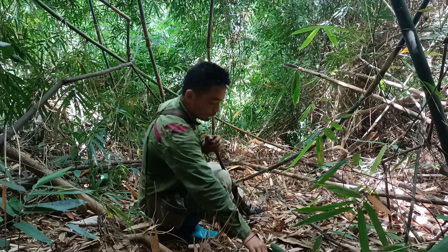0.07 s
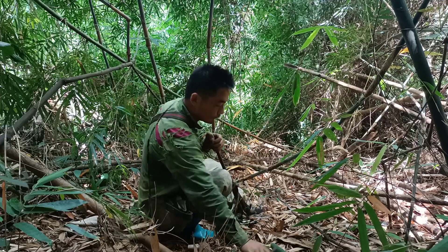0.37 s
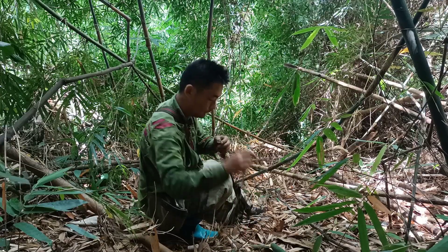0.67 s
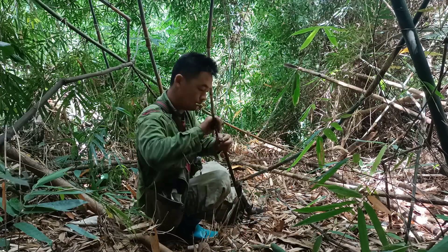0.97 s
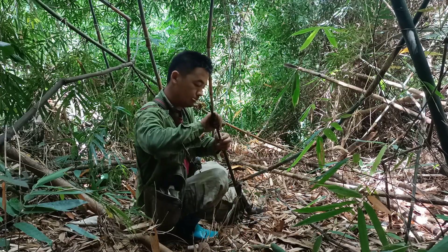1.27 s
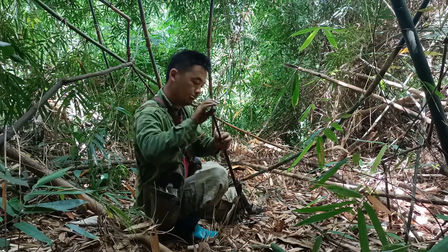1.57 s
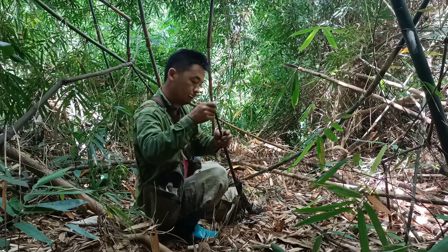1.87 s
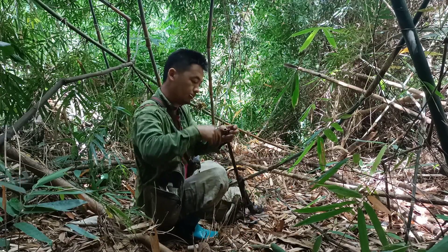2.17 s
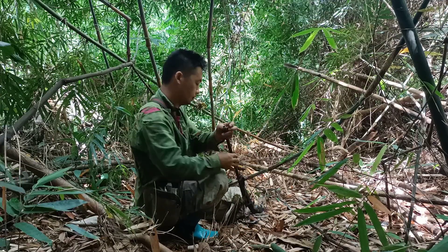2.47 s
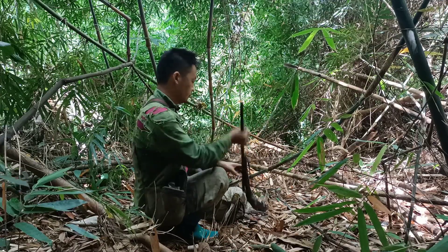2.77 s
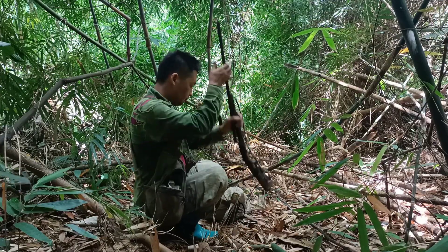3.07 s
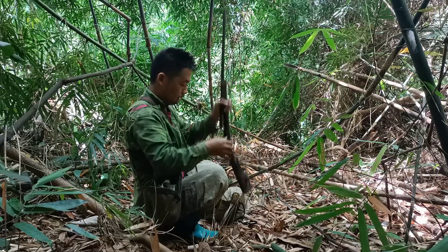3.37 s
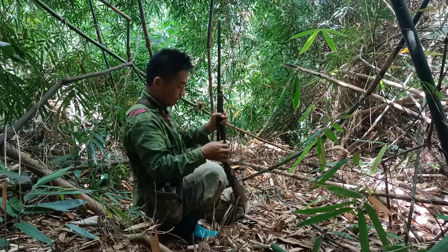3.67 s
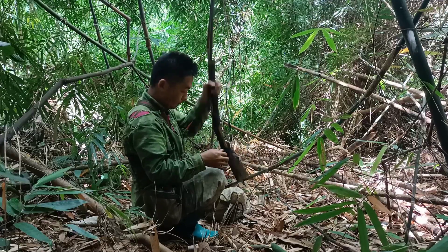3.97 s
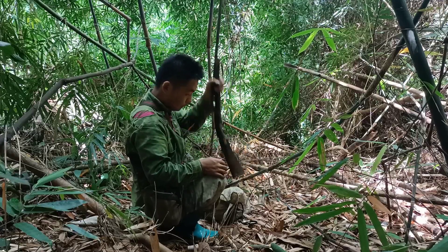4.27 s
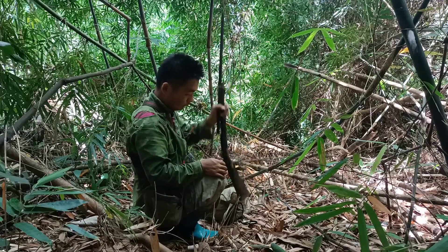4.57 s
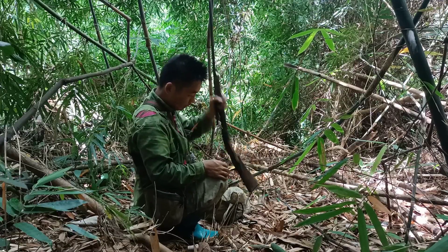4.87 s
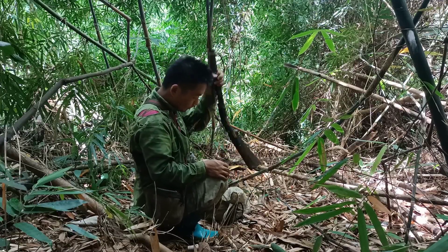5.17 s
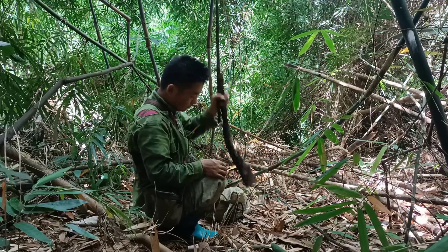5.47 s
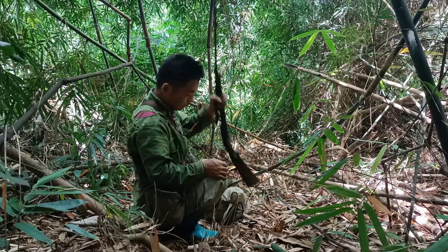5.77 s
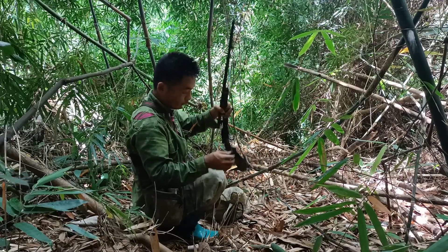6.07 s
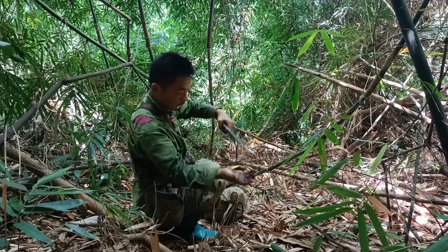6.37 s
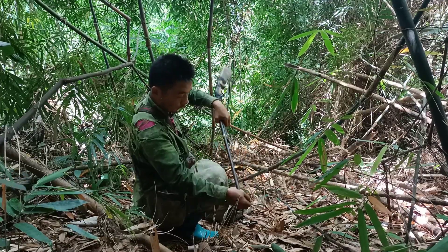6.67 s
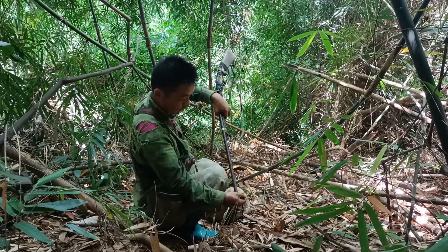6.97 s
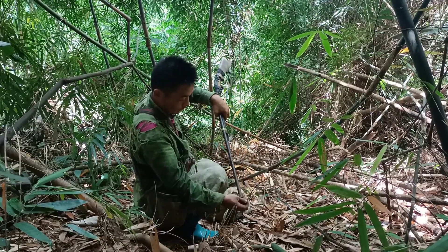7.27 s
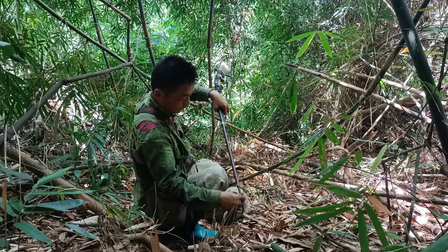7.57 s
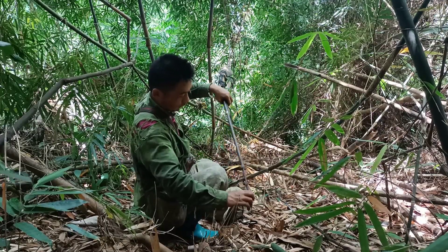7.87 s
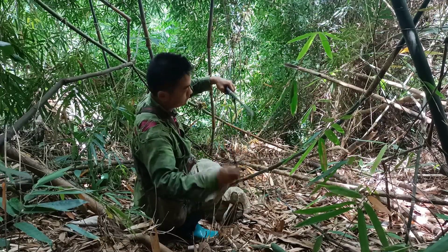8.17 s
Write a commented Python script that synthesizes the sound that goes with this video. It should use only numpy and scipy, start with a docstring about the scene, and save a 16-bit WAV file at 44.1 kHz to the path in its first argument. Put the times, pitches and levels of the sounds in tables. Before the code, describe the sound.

A steel ramrod clinks, squeaks and is rammed six times down a gun barrel, then scrapes out, with dry leaves crackling in a quiet forest.

```python
"""A thin steel rod is rammed into a long steel tube, on the leaf litter of a bamboo forest.
A crouching man brushes dry leaves, taps the rod on the tube's mouth and slides it in, squealing.
Six times he lifts it, knocking the wall, and rams it onto the packed bottom with a dull thud;
then he draws it out with a long scrape. Blows ring the modes of rod and tube, tiny friction slips
keep them ringing as a rasp, and the bamboo stems scatter a short tail over quiet forest air."""
import sys
import numpy as np
from scipy import signal
from scipy.fft import rfft, irfft
from scipy.io import wavfile
from scipy.ndimage import uniform_filter1d

SR = 44100
rng = np.random.default_rng(int(sys.argv[2]) if len(sys.argv) > 2 else 0)


def store_wav(level_fs):
    """Save 16-bit WAV to argv[1]."""
    pcm = np.round(np.clip(np.atleast_2d(level_fs), -1, 1) * 32767)
    wavfile.write(sys.argv[1], SR, pcm.T.astype(np.int16))


N = 362061
RING_T = np.arange(SR // 4) / SR  # time axis of one hit

# modes of the rod in the tube: pitch_hz, level_db, t60_s
ROD_MODES = [(1079, -16, 0.2), (1240, -12.5, 0.026), (1706, 4, 0.013), (1787.5, 8, 0.043),
             (2005, -8, 0.048), (2215, -4.5, 0.028), (2711, 4, 0.037), (2820, -7, 0.068), (3278, -4, 0.052),
             (3445, -5, 0.039), (4068, 5.5, 0.016), (4550, 1.5, 0.038), (4790, 5, 0.016),
             (5310, -1.5, 0.024), (6000, -3, 0.045), (5937, -0.5, 0.12), (6090, 4.5, 0.044),
             (7000, -22, .06), (7300, -17, 0.04), (10500, -14, 0.016), (13840, -32, 0.16)]
# modes of the hand-damped tube: pitch_hz, level_db, t60_s
TUBE_MODES = [(1429, -11.5, 0.026), (1567, -7, 0.033), (1588, -13.5, 0.039), (2840, -11, 0.016),
              (3364, 0, 0.014), (4490, -14, 0.038), (5310, 8, 0.011), (7300, -25, 0.013),
              (6820, 1.5, 0.025), (9100, -13, 0.019), (12560, -0.5, 0.004)]
# noise colour of steel on steel: freq_hz, level_db
CONTACT_EQ = [(100, 20.5), (850, -15), (1200, -12.5), (1800, -7), (4000, -7.5), (7000, 0), (10000, -6),
              (13000, -16.5), (16000, -29)]
# ramming strokes: landing_s, force_db, extra_treble_db, clink_lead_s, rebound_lag_s, lift_db, boom_db
RAM_STROKES = [(3.975, -4, 4.5, 0.014, 0.015, -39, -31.5), (4.379, -1, 1, 0.015, 0.02, -33.5, -32),
               (4.801, -0.5, -4, 0.00017, 0.017, -33.5, -30), (5.206, 1, 0.5, 0.013, 0.017, -35.5, -29.5),
               (5.638, 2.5, -2, .0132, 0.027, -38, -32.5), (6.056, .5, 5, 0.0049, 0.017, -54, -35.5)]


def amp(db):
    """Decibels to gain."""
    return 10 ** (np.asarray(db) / 20)


def unit_rms(x):
    """Scales to rms 1."""
    return x / np.sqrt(np.mean(x ** 2) + 1e-20)


def unit_attack(x):
    """Scales a hit so that its first 8 ms have rms 1."""
    return x / np.sqrt(np.mean(x[..., :353] ** 2) + 1e-20)


def curve_at(points, hz):
    """Reads a curve on a log-frequency axis."""
    freq_hz, value = np.transpose(points)
    return np.interp(np.log(hz + 1), np.log(freq_hz + 1), value)


def eq(x, points):
    """Minimum-phase filter with the given curve."""
    log_gain = np.log(amp(curve_at(points, abs(np.fft.fftfreq(4096, 1 / SR)))))
    taps = np.fft.ifft(np.exp(np.conj(signal.hilbert(log_gain)))).real[:2048]
    return signal.oaconvolve(x, taps.reshape((1,) * (x.ndim - 1) + (-1,)), axes=-1)[..., :x.shape[-1]]


def band(x, hz, kind):
    """Low-, band- or high-pass."""
    return signal.sosfilt(signal.butter(3, hz, kind, fs=SR, output="sos"), x)


def add(mix, start_s, sound):
    """Mixes a sound in at start_s."""
    part = mix[:, round(start_s * SR):][:, :sound.shape[-1]]
    part += sound[..., :part.shape[1]]


def swell(t, peak_s, shape, linger=1):
    """Envelope in dB; shape is (rise_s, hold_s, release_s), each slope covering 30 dB."""
    rise, hold, release = shape
    return -30 * (np.maximum(peak_s - t, 0) / rise + np.maximum(t - peak_s - hold, 0) / (release * linger))


def span(peak_s, shape):
    """The sample times over which a swell is heard."""
    rise, hold, release = shape
    return np.arange(max(peak_s - rise, 0), peak_s + hold + 2 * release, 1 / SR)


def wander(length, window):
    """Smooth random drift of rms 1."""
    return unit_rms(uniform_filter1d(rng.standard_normal(length), size=window))


def grains(length, per_s, vary_db):
    """Random tiny slips or cracks, a few of them large."""
    size = amp(vary_db * np.minimum(rng.exponential(1, length), 4))
    return size * rng.standard_normal(length) * (rng.random(length) < per_s / SR)


def ring(modes, vary_db, detune, spread):
    """Modes ring after a blow; the contact point varies their strength, pitch and stereo phase."""
    hz, db, t60 = np.transpose(modes)[:, :, None]
    size, shift, turn, skew = rng.standard_normal((4, len(modes), 1))
    phase = 2 * np.pi * (hz * (1 + detune * shift) * RING_T + turn)
    decay = amp(db + vary_db * size - 60 * RING_T / t60)
    stereo_phase = spread * skew * hz / hz.max()
    return np.array([(decay * np.sin(phase + side * stereo_phase)).sum(0) for side in (-1, 1)])


def crack(colour, t60, width):
    """A fast-dying burst of contact noise."""
    noise = rng.standard_normal(len(RING_T)) + width * rng.standard_normal((2, len(RING_T)))
    return unit_attack(eq(noise, colour) * amp(-60 * RING_T / t60))


def forest_air(level_db):
    """A quiet, steady bed of air over a low rumble."""
    # colour of the air: freq_hz, level_db
    air_eq = [(20, 7), (60, 2), (160, -1), (300, -7.5), (600, -10.5), (1000, -17), (1500, -14),
              (2500, -20.5), (4000, -23), (7000, -22), (10000, -27.5), (13000, -22), (16000, -32.5)]
    # likeness of left and right: freq_hz, correlation
    stereo_likeness = [(30, 0.067), (70, 0.41), (140, 0.47), (1000, 0.19), (3000, 0.063), (8000, 0.13),
                       (16000, 0.18)]
    hz = np.fft.rfftfreq(N, 1 / SR)
    left, other = rfft(rng.standard_normal((2, N)))
    likeness = curve_at(stereo_likeness, hz)
    right = likeness * left + np.sqrt(1 - likeness ** 2) * other
    air = irfft(np.array([left, right]) * amp(curve_at(air_eq, hz)), N)
    return amp(level_db) * unit_rms(air)


def bamboo_tail(x, wet_db):
    """The bamboo stems scatter a thin, short tail."""
    t60 = [(200, 0.12), (1500, 0.22), (3000, 0.18), (6500, 0.2), (15000, 0.1)]  # freq_hz, t60_s
    colour = [(150, 16.5), (1000, 2), (3000, -15), (6500, -22), (15000, 3.5)]  # freq_hz, level_db
    echoes = rng.standard_normal((2, SR)) * (rng.random((2, SR)) < 3000 / SR)
    echoes *= np.arange(SR) / SR > .006  # pre-delay
    hz, t, spectrum = signal.stft(echoes, SR, nperseg=256)
    spectrum *= amp(curve_at(colour, hz)[:, None] - 60 * t / curve_at(t60, hz)[:, None])
    tail = signal.istft(spectrum, SR, nperseg=256)[1]
    return amp(wet_db) * signal.fftconvolve(x, tail / np.linalg.norm(tail[0]), axes=1)[:, :N]


def low_bumps():
    """Dull, very low bumps, barely heard."""
    modes = [(36, 2, 0.15), (62, -4, .08)]  # pitch_hz, level_db, t60_s
    out = np.zeros((2, N))
    for start_s, level_db in [(4.045, -31), (6.19, -38)]:
        bump = ring(modes, vary_db=0, detune=0, spread=.3) * (1 - np.exp(-RING_T / .008))
        add(out, start_s, amp(level_db) * bump)
    return out


def dry_leaves():
    """Dry leaves crackle under the hand, with a few louder snaps."""
    # hand and sleeve stir the litter: peak_s, (rise_s, hold_s, release_s), level_db
    rustles = [(.46, (0.34, 0.017, 0.44), -42.5), (.68, (.04, 0.033, 0.35), -34), (3.07, (.3, 0.037, 0.17),
               -40)]
    # leaves and twigs snap: start_s, mid_db, treble_db
    snaps = [(.282, -42, -60.5), (0.333, -43, -64), (0.673, -34.5, -33.5), (.702, -39.5, -28),
             (.759, -34, -28.5), (.78, -37.5, -33.5), (2.889, -48.5, -62)]
    # colour of the crackle: freq_hz, level_db
    leaf_eq = [(100, -2), (500, 3), (750, -7), (880, -11.5), (1100, -5), (1580, 2), (2000, -2.5),
               (4000, -4), (7000, 3), (10000, -0.5), (13000, -6.5), (16000, -18)]
    out = np.zeros((2, N))
    for peak_s, shape, level_db in rustles:
        t = span(peak_s, shape)
        centre, left, right = (grains(len(t), per_s=3500, vary_db=1) for _ in range(3))
        crackle = unit_rms(eq(centre + 1.4 * np.array([left, right]), leaf_eq))
        add(out, t[0], amp(level_db + swell(t, peak_s, shape)) * crackle)
    for start_s, mid_db, treble_db in snaps:
        snap = crack(leaf_eq, t60=0.076, width=0.88)
        mid, treble = band(snap, [400, 2300], "band"), band(snap, 2300, "high")
        add(out, start_s, amp(mid_db) * unit_attack(mid) + amp(treble_db) * unit_attack(treble))
    return out


def hollow_stick(level_db):
    """One woody knock on a hollow dry stick in the litter."""
    modes = [(890, 0, 0.037), (1540, -2, 0.034)]  # pitch_hz, level_db, t60_s
    knock = unit_attack(ring(modes, vary_db=.5, detune=0, spread=.5))
    return amp(level_db) * knock * (1 - np.exp(-RING_T / .001))


def rod_modes_at(time_s):
    """The rod's modes at its current depth: the free length is damped as it goes in."""
    # modes of the length standing above the tube: pitch_hz, level_db, t60_s
    free_modes = [(1099, -11, 0.078), (2810, -34, 0.14), (5090, 6.5, 0.043), (7505, 1.5, 0.16),
                  (10620, -14, 0.41), (14200, -20, 0.082)]
    # their fader as the rod goes in and out: time_s, gain_db
    exposure = [(1.3, -0.5), (2.4, -0.5), (3.4, -18), (4.8, -23), (7.5, -10), (8.1, 5.5)]
    exposed_db = np.interp(time_s, *np.transpose(exposure))
    return ROD_MODES + [(hz, db + exposed_db, t60) for hz, db, t60 in free_modes]


def friction_squeal():
    """Friction makes two bending modes sing, a near-pure note and a lower hum; gives start_s, sound."""
    # the rod catches on its way in: peak_s, level_db
    catches = [(2.275, -40.5), (2.35, -24.5), (2.455, -27.5), (2.489, -21), (2.576, -34)]
    # the soft note between catches: peak_s, (rise_s, hold_s, release_s), level_db
    sustain = (2.33, (0.089, 0.184, 0.0997), -38)
    note_hz, hum_hz, catch_shape = 2712, 1088, (.03, 0.011, 0.049)
    t = np.arange(span(catches[0][0], catch_shape)[0], span(catches[-1][0], catch_shape)[-1], 1 / SR)
    swells = [sustain] + [(s, catch_shape, db) for s, db in catches]
    note_db = np.max([db + swell(t, s, shape) for s, shape, db in swells], 0)
    lingering_db = np.max([db + swell(t, s, shape, linger=1.8) for s, shape, db in swells], 0)
    hum_db = np.minimum(lingering_db - 15, -41.5)  # follows the note, up to a ceiling
    wavering_t = np.cumsum(1 + 0.0026 * wander(len(t), window=400)) / SR
    pan_db = np.array([[-5], [2.5]])
    note = amp(note_db + pan_db) * np.sin(2 * np.pi * note_hz * wavering_t)
    hum = amp(hum_db) * np.sin(2 * np.pi * hum_hz * wavering_t)
    return t[0], note + hum


def scrape(rubs, modes, slips_per_s, vary_db, clump_db, hiss_db, detune, treble_linger, level_db):
    """Clumps of tiny slips keep the modes ringing over a dry contact hiss; gives start_s, sound."""
    t = np.arange(span(*rubs[0][:2])[0], span(*rubs[-1][:2])[-1], 1 / SR)
    body_db = np.max([db + swell(t, s, shape) for s, shape, db, _ in rubs], 0)
    treble_db = np.max([db + swell(t, s, shape, treble_linger) for s, shape, _, db in rubs], 0)
    clumps = amp(clump_db * wander(len(t), window=350))
    slips, left, right = (clumps * grains(len(t), slips_per_s, vary_db) for _ in range(3))
    spots, hops_per_s = 5, 35  # the contact hops along the rod, favouring other modes
    contact = np.cumsum(rng.random(len(t)) < hops_per_s / SR) % spots
    ringing = np.zeros((2, len(t)))
    for spot in range(spots):
        response = ring(modes, vary_db=3, detune=detune, spread=4.18)
        ringing += signal.fftconvolve((slips * (contact == spot))[None], response, axes=1)[:, :len(t)]
    hiss = eq(slips + 1.5 * np.array([left, right]), CONTACT_EQ)
    rasp = band(unit_rms(ringing) + amp(hiss_db) * unit_rms(hiss), 650, "high")
    body, treble = unit_rms(band(rasp, 4200, "low")), unit_rms(band(rasp, 4200, "high"))
    return t[0], amp(level_db) * (amp(body_db) * body + amp(treble_db - 4.5) * treble)


def rim_slides():
    """The rod slides on the rim of the tube, going in and coming out."""
    # slides: peak_s, (rise_s, hold_s, release_s), body_db, treble_db
    slides = [(1.52, (.015, 0.089, 0.072), -33, -30.5), (2.08, (.03, 0.066, 0.1), -46.5, -54),
              (2.33, (0.11, 0.22, 0.082), -33.5, -29.5), (7.79, (.035, .14, 0.097), -32, -30),
              (8.114, (0.089, 0.02, 0.079), -32, -34)]
    # colour of the rim: freq_hz, gain_db
    rim_eq = [(1100, 0.5), (1800, -1), (3400, 0.5), (6000, 0), (14000, 0)]
    out = np.zeros((2, N))
    for slide in slides:
        start_s, rasp = scrape([slide], rod_modes_at(slide[0]), slips_per_s=2500, vary_db=2.5,
                               clump_db=2, hiss_db=-2, detune=0.0032, treble_linger=0.96, level_db=-2.5)
        add(out, start_s, eq(rasp, rim_eq))
    return out


def draw_out():
    """The rasp swells as the rod is drawn up, gathering speed; gives start_s, sound."""
    # the pull: peak_s, (rise_s, hold_s, release_s), body_db, treble_db
    pull = (7.21, (.5, .17, 0.24), -34, -33.5)
    # muffling by the tube: freq_hz, gain_db
    tube_eq = [(1700, -2.5), (2800, 2.5), (6000, -1), (9000, -6.5)]
    start_s, rasp = scrape([pull], ROD_MODES, slips_per_s=2400, vary_db=2, clump_db=2.5,
                           hiss_db=0.5, detune=.012, treble_linger=0.51, level_db=-1.5)
    return start_s, eq(rasp, tube_eq)


def stroke_rubs():
    """Each stroke rubs on the lift, the push and the judder after landing; gives start_s, sound."""
    rubs = []  # peak_s, (rise_s, hold_s, release_s), body_db, treble_db
    for landing_s, force_db, treble_db, _, _, lift_db, _ in RAM_STROKES:
        lift = (landing_s - .215, (.09, 0.012, 0.29), lift_db, lift_db + 0.5)
        push = (landing_s - 0.029, (0.16, 0.056, 0.033), -38, -37.5)
        judder = (landing_s + 0.0072, (0.055, 0.021, 0.095), force_db - 29.5, force_db + treble_db - 27)
        rubs += [lift, push, judder]
    return scrape(rubs, ROD_MODES + TUBE_MODES, slips_per_s=3500, vary_db=3, clump_db=1.5,
                  hiss_db=5, detune=0.0031, treble_linger=1.51, level_db=-1)


def with_lead_in(hit, lead_in_s, lead_in_db):
    """A faint, brief swell of the hit's own colour leads in, softening the attack."""
    ramp = np.linspace(0, 1, round(lead_in_s * SR)) ** 2
    noise = grains(len(RING_T), per_s=4400, vary_db=0)
    wash = signal.fftconvolve(hit, noise[None], axes=1)[:, len(RING_T) - len(ramp):len(RING_T)]
    attack_rms = np.sqrt(np.mean(hit[:, :353] ** 2))
    return np.concatenate([amp(lead_in_db) * attack_rms * ramp * unit_rms(wash), hit], axis=1)


def steel_hits(hits, modes_at, detune, crack_db, crack_t60, chatter_db, rise_s, lowest_hz,
               mid_share, mid_db, level_db):
    """Steel strikes steel: a crack, ringing modes and a chatter of small rebounds."""
    lead_in_s, chatter_t60 = .009, 0.18
    chatter_envelope = amp(-60 * RING_T / chatter_t60) * (1 - np.exp(-RING_T / 0.0029))
    out = np.zeros((2, N))
    for time_s, ring_db, bite_db in hits:
        body = unit_attack(ring(modes_at(time_s), vary_db=5.5, detune=detune, spread=3.3))
        rebounds = grains(len(RING_T), per_s=1400, vary_db=4.5) * chatter_envelope
        rebounds /= np.linalg.norm(rebounds) + 1e-9
        force = amp((bite_db + 22) / 2)  # hard blows crack, light ones only ring
        hit = body + force * amp(crack_db) * crack(CONTACT_EQ, crack_t60, width=0.53)
        hit *= 1 - np.exp(-(RING_T / rise_s) ** 2)  # the contact builds up
        hit += amp(chatter_db) * signal.fftconvolve(hit, rebounds[None], axes=1)[:, :len(RING_T)]
        between_db = ring_db + mid_share * (bite_db - ring_db) + mid_db  # mids partly follow the bite
        low = amp(ring_db) * unit_attack(band(hit, [lowest_hz, 2100], "band"))
        mid = amp(between_db) * unit_attack(band(hit, [2450, 3800], "band"))
        high = amp(bite_db) * unit_attack(band(hit, 4500, "high"))
        softened = with_lead_in(low + mid + high, lead_in_s, lead_in_db=-16.5)
        add(out, time_s - rise_s / 2 - lead_in_s, softened)
    return amp(level_db) * out


def tube_knocks():
    """The gripped rod knocks inside the hand-damped tube, mostly as it is lifted."""
    # knocks on the wall: time_s, ring_db, bite_db
    knocks = [(3.66, -37, -53), (3.7158, -20.5, -19.5), (4.1364, -26.5, -27.5), (4.1773, -28, -20),
              (4.1879, -26.5, -28), (4.2104, -29, -33.5), (4.5237, -27, -33.5), (4.5394, -25.5, -38),
              (4.5743, -23, -17.5), (4.6453, -16, -24.5), (4.7455, -34.5, -50), (4.8103, -22.5, -24.5),
              (4.8962, -25, -44), (4.9467, -31, -58), (4.9703, -28, -34), (4.9848, -31, -21.5),
              (5.0287, -30.5, -29.5), (5.0606, -30, -40), (5.234, -25.5, -30), (5.3902, -29, -41),
              (5.4115, -23.5, -14), (5.55, -33.5, -29.5), (5.5616, -27, -41), (5.8348, -33, -67),
              (5.8556, -31, -62)]
    return steel_hits(knocks, lambda time_s: TUBE_MODES, detune=0.0307, crack_db=-3.5, crack_t60=0.037,
                      chatter_db=-10.5, rise_s=.0025, lowest_hz=1090,
                      mid_share=0.54, mid_db=-1.5, level_db=-1.5)


def rod_clinks():
    """The rod rings on the tube: loose taps, then a clink before each landing and one on the rebound."""
    # taps of the free rod: time_s, ring_db, bite_db
    taps = [(1.3283, -22, -37.5), (1.5079, -26, -31.5), (2.2627, -51, -34), (2.2986, -50, -29),
            (2.3441, -27, -23), (2.3695, -24, -35), (2.4752, -26, -34.5), (3.036, -46, -40),
            (3.138, -38.5, -52), (3.455, -35.5, -31.5), (3.7015, -31.5, -37), (3.8015, -39.5, -37),
            (3.9242, -24.5, -36.5), (5.8762, -34.5, -33.5), (5.9971, -31.5, -27), (6.029, -21.5, -19.5),
            (6.9629, -31.5, -41.5), (7.055, -36.5, -38.5), (7.1083, -36, -36.5), (7.1846, -35.5, -40),
            (7.2073, -33.5, -31), (7.3368, -43, -32.5), (7.3828, -30.5, -34), (7.7873, -34.5, -17.5),
            (8.1396, -47, -30)]
    clinks = list(taps)
    for landing_s, force_db, treble_db, lead_s, lag_s, _, _ in RAM_STROKES:
        wall = (landing_s - lead_s, force_db - 22, force_db + treble_db - 17)
        rebound = (landing_s + lag_s, force_db - 28, force_db + treble_db - 23)
        clinks += [wall, rebound]
    return steel_hits(clinks, rod_modes_at, detune=0.0072, crack_db=-1, crack_t60=0.062, chatter_db=-9,
                      rise_s=.0013, lowest_hz=750, mid_share=0.38, mid_db=2.5, level_db=-2.5)


def ram_thuds():
    """The packing stops the rod: a dull smack and a short boom of the tube's wooden butt."""
    # low modes of butt and packing: pitch_hz, level_db, t60_s
    boom_modes = [(133, -13, 0.011), (167, -2, 0.074), (213.5, 1.5, 0.0203)]
    # their higher modes: pitch_hz, level_db, t60_s
    smack_modes = [(316, -7.5, 0.044), (429, 1.5, 0.021), (555, -3, 0.039), (653, -1, 0.034),
                   (1196, 1.5, 0.027), (1270, -3.5, 0.071), (1563, 10, 0.017)]
    # the first, gentle touch of the bottom: start_s, boom_db, smack_db
    first_touch = (2.535, -28.5, -36)
    landings = [(s, boom_db, force_db - 20.5) for s, force_db, *_, boom_db in RAM_STROKES]
    attack = 1 - np.exp(-RING_T / .0007)
    out = np.zeros((2, N))
    for start_s, boom_db, smack_db in [first_touch] + landings:
        boom = unit_attack(ring(boom_modes, vary_db=1, detune=.02, spread=.1))
        smack = unit_attack(ring(smack_modes, vary_db=1.5, detune=.025, spread=.3))
        add(out, start_s, (amp(boom_db) * boom + amp(smack_db) * smack) * attack)
    return band(out, 114, "high")  # the narrow butt radiates little deep bass


def scene():
    """Rod, tube and leaves up close, among the bamboo stems."""
    near = rod_clinks() + tube_knocks() + ram_thuds() + low_bumps() + dry_leaves() + rim_slides()
    add(near, *draw_out())
    add(near, *stroke_rubs())
    add(near, *friction_squeal())
    add(near, .761, hollow_stick(level_db=-29))
    return near + bamboo_tail(near, wet_db=-18) + forest_air(level_db=-47.5)


def record(dry):
    """Each microphone port has its own deep notch, the right lags a little, and the top is cut off."""
    # colour of the left port: freq_hz, gain_db
    left_eq = [(60, -1.5), (500, 3), (3000, 2), (5000, -3), (5900, -8.5), (6500, -29), (7100, -39),
               (7500, -15), (8200, 0), (9900, 8), (11200, -1), (12500, 5), (14000, -2), (15500, -40)]
    # colour of the right port: freq_hz, gain_db
    right_eq = [(60, 1), (500, 2.5), (3000, 3), (5000, 2.5), (7300, 4), (8100, -4.5), (9000, -7.5),
                (9600, -20), (10400, -19), (11600, -4.5), (13000, 1), (13700, 6.5), (15300, 18)]
    ports = np.array([eq(dry[0], left_eq), np.roll(eq(dry[1], right_eq), 2)])
    lowpass = signal.firwin(301, cutoff=15750, window=("kaiser", 9), fs=SR)
    return signal.oaconvolve(np.clip(ports, -1, 1), lowpass[None], "same")


dry = scene()
out = record(dry)
store_wav(out)
```